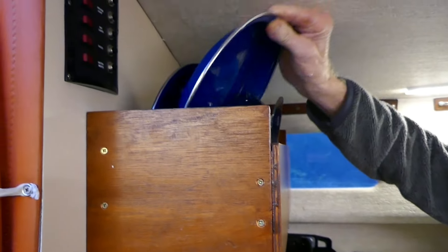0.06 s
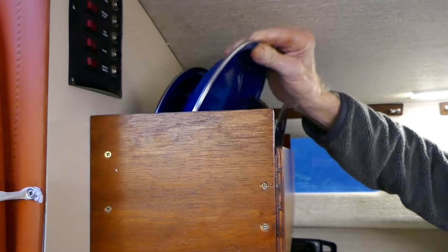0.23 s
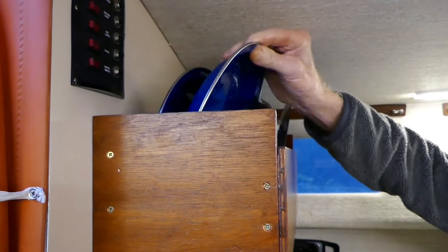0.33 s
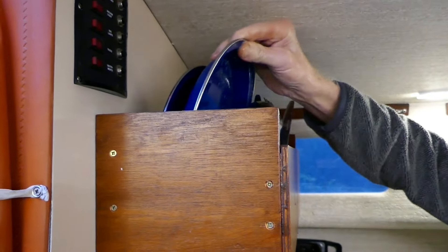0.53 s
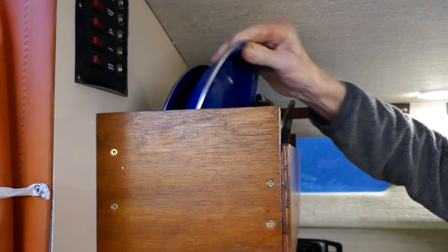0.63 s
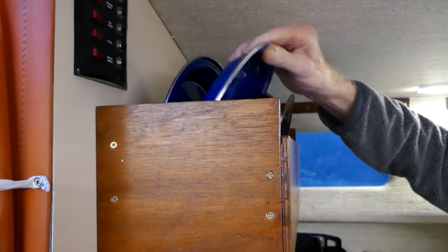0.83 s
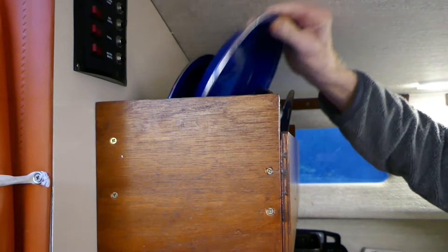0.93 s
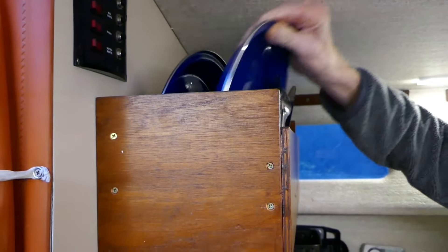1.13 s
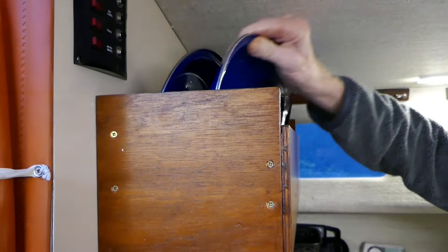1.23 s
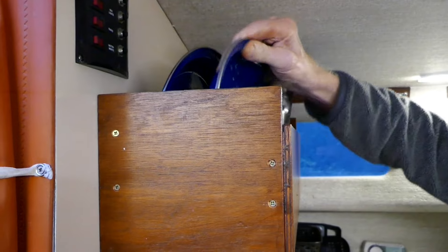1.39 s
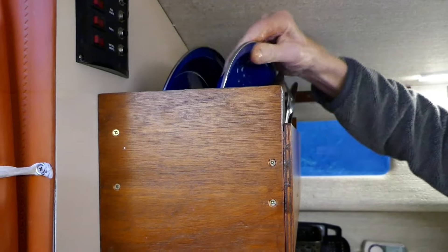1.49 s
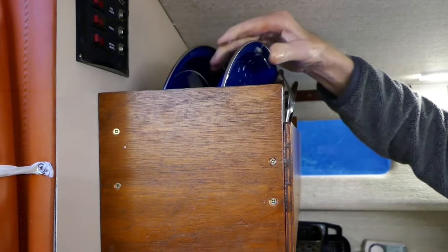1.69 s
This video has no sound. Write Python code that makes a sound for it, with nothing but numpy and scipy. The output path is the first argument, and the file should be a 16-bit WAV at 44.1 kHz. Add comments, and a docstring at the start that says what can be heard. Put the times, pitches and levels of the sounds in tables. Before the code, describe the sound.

Enamel plates clatter into a wooden rack in a small boat galley, heard up close. A ringing knock comes first, then rims scrape and chatter between further clinks and hollow wooden thuds, ending on a few sharp clinks.

```python
"""A small boat galley, stereo microphone close to a wooden rack being filled with enamel plates.
Over quiet room tone the first plate glides in with a faint whine. At 0.2 s it knocks home: the rack
thuds, the steel clacks, clinks and rings on, and the near walls add a short echo. Rims scrape and
chatter between further knocks, plates land with a boom of the wood, and the cabinet's rumble grows.
The last sharp clinks come at about 1.5 s, then one faint touch."""
import sys
import numpy as np
from scipy import signal
from scipy.fft import rfft, irfft
from scipy.io import wavfile
from scipy.ndimage import uniform_filter1d, map_coordinates

SR = 44100
rng = np.random.default_rng(int(sys.argv[2]) if len(sys.argv) > 2 else 0)


def transcribe(u):
    """Save the signal u as a 16-bit wav file named by the first command-line argument.

    u: samples, shape (n,) or (channels, n), limited to [-1, 1]; the rate is SR.
    q: integer samples, one column per channel.
    """
    v = np.clip(np.atleast_2d(u).T, -1, 1)
    q = np.round(v * 32767).astype(np.int16)
    wavfile.write(sys.argv[1], SR, q)


N = 77175
TIME = np.arange(N) / SR


def from_db(db):
    """Decibels to gain."""
    return 10 ** (np.asarray(db) / 20)


def rms(x):
    """Root mean square."""
    return np.sqrt(np.mean(x ** 2) + 1e-20)


def decay(t, t60_s):
    """A fall of 60 dB every t60_s."""
    return np.exp(-np.log(1000) * t / t60_s)


def stereo(mid, side, side_db):
    """Left and right from mid and side."""
    return mid + from_db(side_db) * side * np.array([[1], [-1]])


def add(out, start_s, sound):
    """Mix a sound in at start_s."""
    i = int(np.clip(start_s * SR, 0, N - 1))
    out[..., i:i + sound.shape[-1]] += sound[..., :N - i]


def through(x, response):
    """Pass a sound through a stereo response."""
    return signal.fftconvolve(np.atleast_2d(x), response, axes=1)[:, :N]


def gain_at(spectrum, hz):
    """Gain of a spectrum at these frequencies."""
    points_hz, db = np.transpose(spectrum)
    return from_db(np.interp(np.log(hz + 1), np.log(points_hz), db))


def ring(modes):
    """Free decay of modes (pitch_hz, level_db, t60_s), each starting with either sign."""
    t = TIME[:N // 3]
    return sum(np.sqrt(2) * from_db(db) * decay(t, t60_s) * np.sin(2 * np.pi * hz * t)
               * rng.choice([-1, 1]) for hz, db, t60_s in modes)


# Spectrum of the galley's background: frequency_hz, gain_db
ROOM_TONE = [(25, -10), (90, -15), (250, -4), (620, -5), (1300, -14), (2500, -20.5), (4200, -35),
             (16000, -40.5)]

def room_tone(level_db=-51.5):
    """Quiet, dark noise all around the microphone."""
    noise = stereo(*rng.standard_normal((2, N)), side_db=-3.5)
    hz = np.arange(N // 2 + 1) * SR / N
    noise = irfft(rfft(noise) * gain_at(ROOM_TONE, hz), N)
    return from_db(level_db) * noise / rms(noise)


# Course of the first plate's whine: time_s, pitch_hz, level_db
GLIDE = [(0, 1030, -61), (.16, 1070, -52), (.25, 1100, -72)]

def whine(waver_hz=12):
    """The first plate glides in with a thin, wavering, rising tone."""
    time_s, hz, db = np.transpose(GLIDE)
    waver = uniform_filter1d(rng.standard_normal(N), size=300)
    pitch_hz = np.interp(TIME, time_s, hz) + waver_hz * waver / rms(waver)
    level = from_db(np.interp(TIME, time_s, db)) * (TIME < time_s[-1])
    return level * np.sin(2 * np.pi * np.cumsum(pitch_hz) / SR)


# Rise and fall of the cabinet's rumble: time_s, level_db
RUMBLE_LEVELS = [(.1, -75), (.35, -52.5), (.8, -47), (1.3, -43.5), (1.75, -52.5)]

def cabinet_rumble(band_hz=(125, 313)):
    """The wooden cabinet rumbles while the hand works the plates."""
    band = signal.butter(2, band_hz, "band", fs=SR, output="sos")
    noise = signal.sosfilt(band, rng.standard_normal(N))
    level_db = np.interp(TIME, *np.transpose(RUMBLE_LEVELS))
    return from_db(level_db) * noise / rms(noise)


# Spectra of the rack's thud and the plates' clack, clink and tick: frequency_hz, gain_db
THUD = [(60, -24.5), (125, -11.5), (200, -1.5), (380, 0.5), (650, 2), (950, -5.5), (1300, -7.5)]
CLACK = [(1100, -14.5), (1550, -3.5), (1950, 1.5), (2200, 2.5), (2550, 2), (2800, -4.5), (3000, -34)]
CLINK = [(2950, 1.5), (3400, 5), (4000, -0.5), (4600, 2.5), (5300, -1.5), (6300, -13)]
TICK = [(6200, -3), (7500, -1), (8500, -1), (10500, 2.5), (12500, -7.5), (14500, 0), (16000, -24)]
# Those four families of damped modes, in that order: spectrum, t60_s, side_db
FAMILIES = [(THUD, 0.059, -18), (CLACK, 0.061, -20.5), (CLINK, 0.056, -12.5), (TICK, 0.05, -5)]

def damped_modes(count=42):
    """Dense, unevenly spaced modes of wood and steel; yields (modes, side_db) for each family."""
    t = TIME[:N // 6]
    for spectrum, t60_s, side_db in FAMILIES:
        low_hz, high_hz = spectrum[0][0], spectrum[-1][0]
        hz = low_hz + (high_hz - low_hz) * (np.arange(count) + rng.random(count)) / count
        life_s = t60_s * np.exp(rng.uniform(-.6, .6, count))
        tones = np.sin(2 * np.pi * hz[:, None] * t)
        yield gain_at(spectrum, hz)[:, None] * decay(t, life_s[:, None]) * tones, side_db


def strike(modes, side_db, spread_db=3, grip_shift=.05):
    """A touch at a new spot gives each mode its own strength; grip and support detune them a little."""
    shape = (2, len(modes))
    strengths = rng.choice([-1, 1], shape) * from_db(spread_db * rng.standard_normal(shape))
    detune = 1 + grip_shift * rng.uniform(-1.055, 1)
    steps = np.arange(modes.shape[1]) * detune
    mid, side = (map_coordinates(x, [steps], order=3) for x in strengths @ modes)
    sound = stereo(mid, side, side_db)
    return sound / rms(sound[:, :265])  # rms 1 over the first 6 ms


def wood_onset(sound, swell_s=.0013):
    """The rack takes a moment to start moving."""
    return sound * (1 - np.exp(-TIME[:sound.shape[-1]] / swell_s))


# A rim touches the rack or another plate: start_s, thud_db, clack_db, clink_db, tick_db
RIM_CONTACTS = [(0.1987, -53, -22.5, -42, -33), (.2010, -15, -29, -29.5, -45), (.2113, -39, -24, -25, -28),
                (0.2232, -52, -23, -25.5, -60), (0.291, -66, -32, -49, -63), (0.307, -28, -43, -41, -66),
                (.4660, -35, -26.5, -37.5, -53), (0.5008, -26.5, -21.5, -25, -34.5),
                (0.648, -52, -56, -54, -54), (.8020, -52, -33.5, -38.5, -63), (.9270, -34, -35, -33, -43),
                (0.9431, -18.5, -24.5, -38, -37), (.9523, -20.5, -23, -31, -31),
                (.9630, -20.5, -23.5, -24.5, -39), (.9815, -24.5, -21, -23, -34),
                (1.1121, -23.5, -21, -25.5, -28), (1.19, -68, -31, -33.5, -45),
                (1.2240, -30.5, -25, -32.5, -37), (1.244, -23, -24, -31.5, -31),
                (1.2570, -21.5, -25.5, -49, -37), (1.277, -31.5, -30.5, -32.5, -40.5),
                (1.2975, -43, -28, -29, -35), (1.4598, -37, -25, -32.5, -41),
                (1.5161, -45, -21.5, -23, -30.5), (1.7270, -76, -45, -63, -83)]

def rim_contacts(families, crack_hz=2800, crack_above_tick_db=18, crack_t60_s=.002):
    """Each contact strikes all four families and opens with a sharp crack of hard enamel."""
    out = np.zeros((2, N))
    for start_s, *levels_db in RIM_CONTACTS:
        thud, clack, clink, tick = (from_db(db) * strike(*f) for db, f in zip(levels_db, families))
        add(out, start_s, wood_onset(thud) + clack + clink + tick)
        add(out, start_s, ring([(crack_hz, levels_db[-1] + crack_above_tick_db, crack_t60_s)]))
    return out


# Short, bright notes of a rim: start_s, pitch_hz, half_width_hz, level_db
RIM_CLANKS = [(0.1993, 2480, 146, -20), (0.224, 2406, 116, -25), (0.2533, 2480, 68.3, -28),
              (0.942, 4720, 258, -23), (1.225, 2492, 325, -21), (1.5175, 2390, 129, -25),
              (1.53, 2280, 178, -24.5)]

def rim_clanks(t60_s=.13, count=5):
    """A struck rim sounds a cluster of close modes that beat against each other."""
    out = np.zeros(N)
    fade = decay(TIME, t60_s)
    for start_s, pitch_hz, half_width_hz, level_db in RIM_CLANKS:
        offsets = np.linspace(-1, 1, count) + rng.uniform(-1.12, 1, count) / count
        clank = fade * sum(np.sin(2 * np.pi * hz * TIME) * rng.uniform(.14, 1) * (-1) ** k
                           for k, hz in enumerate(pitch_hz + half_width_hz * offsets))
        add(out, start_s, from_db(level_db) * clank * rms(fade) / rms(clank))
    return out


# Single modes of the rack or a plate: start_s, pitch_hz, level_db, t60_s
SINGLE_MODES = [(.2025, 455, -15, .075), (.2105, 705, -23, .1), (.2113, 4400, -29, .15),
                (.2113, 4592, -40, .38), (.2113, 5233, -35.5, .42), (.5005, 1319, -35, .25),
                (.5005, 3575, -28, .13), (.9815, 2195, -21, .09), (.9815, 3392, -17.5, .135),
                (.9815, 3844, -32, .19), (1.1880, 4280, -36, .09), (1.2975, 3880, -30, .08)]

def pings():
    """A contact sets one mode ringing above the rest."""
    out = np.zeros(N)
    for start_s, *mode in SINGLE_MODES:
        add(out, start_s, ring([mode]))
    return out


def shimmer(low_hz=2900, high_hz=9000, db_per_octave=-14, t60_s=.42, count=24):
    """The many weak high partials of enamelled steel; starts at rms 1."""
    hz = low_hz * (high_hz / low_hz) ** ((np.arange(count) + rng.random(count)) / count)
    db = db_per_octave * np.log2(hz / low_hz) + rng.uniform(-6, 6, count)
    return ring(zip(hz, db, np.full(count, t60_s))) / np.linalg.norm(from_db(db))


# Free modes of the held, middle and back plates: pitch_hz, gain_db, t60_s
HELD_MODES = [(1109, -12, 2), (1340, -2.5, 1.6), (1809, -8, 1), (2562, -7, .45), (2632, -11, .9),
              (3203, -12, .9), (3262, -4, .8), (3712, -7, .6)]
MIDDLE_MODES = [(1448, -8, .7), (1653, 0, 1.2), (1820, -4, .8), (2119, -6, .9), (3063, -12, .7)]
BACK_MODES = [(1366, 0, 1.3), (1833, 1, .5), (2181, 2, .45), (2354, -1, .8), (2530, -5, .6)]
# Knocks that ring the plates: start_s, free_s, held_db, middle_db, back_db, shimmer_db
HARD_KNOCKS = [(.2115, .3, -35.5, -43.5, -70, -40), (.5005, .17, -53, -37.5, -65, -42.5),
               (.9815, .14, -39, -44, -56, -42), (1.1120, .3, -53, -53, -40, -46)]

def ringing_plates(damped_t60_s=.25):
    """A hard knock leaves three plates ringing until a touch damps them, free_s later."""
    out = np.zeros(N)
    for start_s, free_s, *levels_db, shimmer_db in HARD_KNOCKS:
        sound = from_db(shimmer_db) * shimmer()
        for modes, db in zip((HELD_MODES, MIDDLE_MODES, BACK_MODES), levels_db):
            sound += from_db(db) * ring(modes)
        touched_s = np.maximum(TIME[:len(sound)] - free_s, 0)
        add(out, start_s, sound * decay(touched_s, damped_t60_s))
    return out


# A rim slides and chatters: peak_s, swell_s, t60_s, thud_db, clack_db, clink_db, tick_db
RIM_SLIDES = [(0.229, 0.0057, 0.24, -27.5, -30, -33.5, -36),
              (0.293, 0.051, 0.091, -38.5, -45, -32.5, -49.5), (.489, 0.068, 0.27, -32, -34, -46, -58),
              (.617, 0.043, .097, -35, -41, -57, -66), (0.702, 0.055, 0.15, -45, -41.5, -52, -57.5),
              (0.803, 0.046, 0.16, -27.5, -27.5, -42.5, -50),
              (0.882, 0.024, 0.056, -32.5, -33.5, -51.5, -59),
              (0.963, 0.054, 0.086, -29.5, -31.5, -35.5, -39.5),
              (1.142, 0.062, 0.36, -32.5, -30, -36, -41.5), (1.263, 0.14, 0.34, -27, -33, -40, -51.5),
              (1.459, 0.027, 0.26, -22.5, -26.5, -41, -49), (1.547, 0.027, 0.2, -25, -28.5, -35.5, -45)]

def rim_scrapes(families, slips_per_s=520, spread_db=3):
    """A sliding rim sticks and slips: dense, uneven clicks drive the damped modes."""
    out = np.zeros((2, N))
    for peak_s, swell_s, t60_s, *levels_db in RIM_SLIDES:
        swell = np.exp(2 * np.minimum(TIME - peak_s, 0) / swell_s)
        pressure = swell * decay(np.maximum(TIME - peak_s, 0), t60_s)
        for db, family in zip(levels_db, families):
            sizes = from_db(spread_db * np.minimum(rng.exponential(1, N), 3))
            slips = sizes * rng.choice([-1, 1], N) * (rng.random(N) < slips_per_s / SR)
            scrape = through(slips * pressure, strike(*family))
            out += from_db(db) * scrape * rms(pressure) / rms(scrape)
    return out


# Free modes of the wooden rack: pitch_hz, gain_db, t60_s
RACK_MODES = [(262, -9, .25), (340, -3, .16), (364, 2, .22), (497, -5, .16), (657, -5, .18), (886, 3, .2)]
# A plate drops into its slot: start_s, level_db
SLOT_LANDINGS = [(.4690, -27.5), (.6120, -38.5), (.8050, -26.5), (.9523, -38), (1.0500, -42), (1.2570, -35),
                 (1.4400, -34)]

def rack_booms():
    """The rack booms under each landing plate."""
    out = np.zeros(N)
    for start_s, level_db in SLOT_LANDINGS:
        add(out, start_s, from_db(level_db) * wood_onset(ring(RACK_MODES)))
    return out


def galley_echo(sound, t60_s=.28, level_db=-14, dull_hz=3900, delay_s=.004):
    """Dense, slightly dull reflections from near walls reach the microphone just after the sound."""
    tail = stereo(*rng.standard_normal((2, N)), side_db=-6.5) * decay(TIME, t60_s) * (TIME > delay_s)
    tail /= rms(tail) * np.sqrt(N)
    dull = signal.butter(2, dull_hz, fs=SR)
    return from_db(level_db) * through(sound, signal.lfilter(*dull, tail))


def scene(bass_cut_hz=116):
    """The galley from beside the rack; a high-pass leaves the knocks and clatter without their deepest bass."""
    families = list(damped_modes())
    clatter = whine() + rim_contacts(families) + rim_scrapes(families)
    ringing = rim_clanks() + pings() + ringing_plates() + rack_booms()
    bass_cut = signal.butter(3, bass_cut_hz, "high", fs=SR, output="sos")
    dishes = signal.sosfilt(bass_cut, clatter + galley_echo(clatter) + ringing)
    return room_tone() + cabinet_rumble() + dishes


def record(dry, stop_hz=16800):
    """The microphone signal loses its highest treble to a steep low-pass."""
    return signal.sosfilt(signal.cheby2(16, 60, stop_hz, fs=SR, output="sos"), dry)


dry = scene()
out = record(dry)
transcribe(out)
```